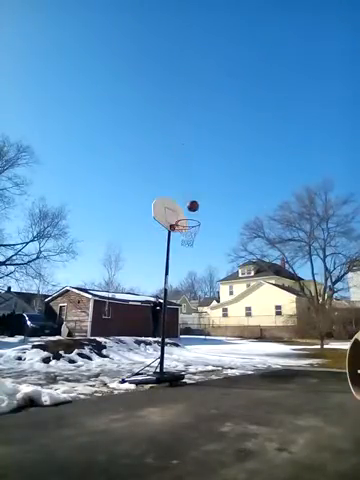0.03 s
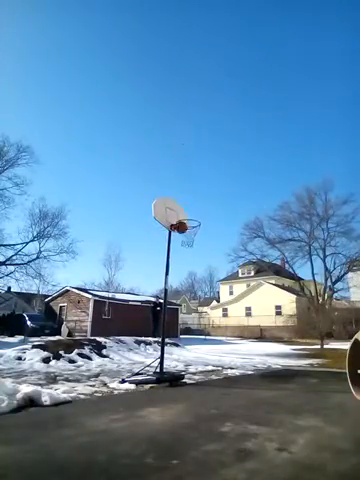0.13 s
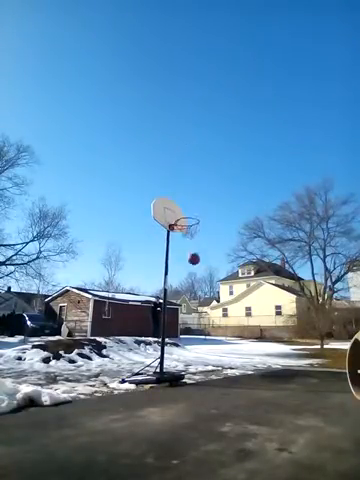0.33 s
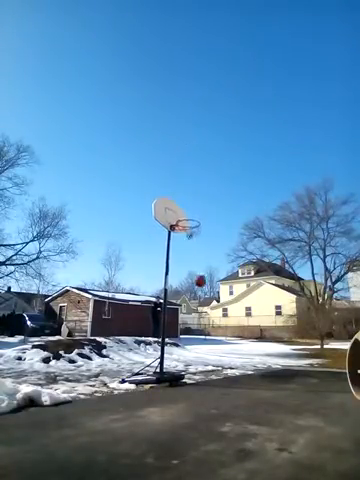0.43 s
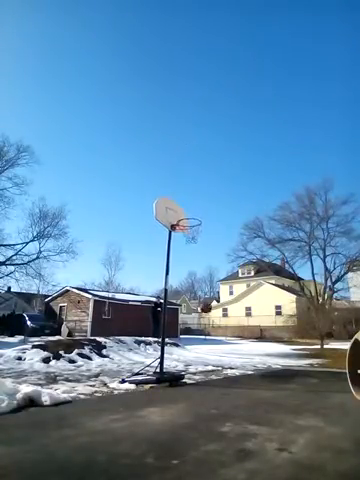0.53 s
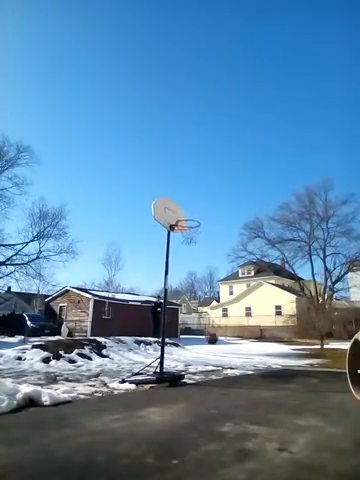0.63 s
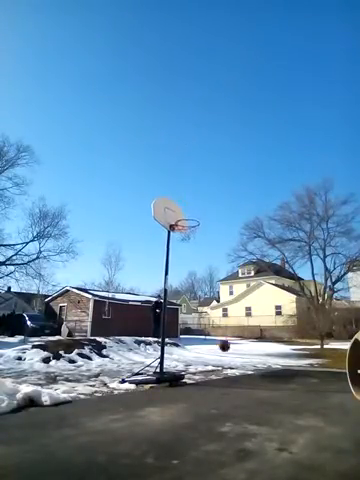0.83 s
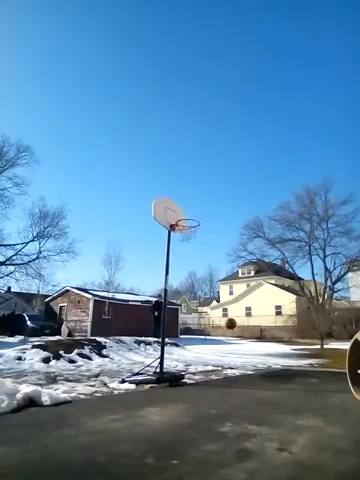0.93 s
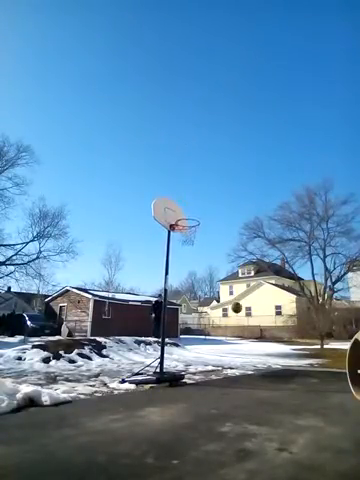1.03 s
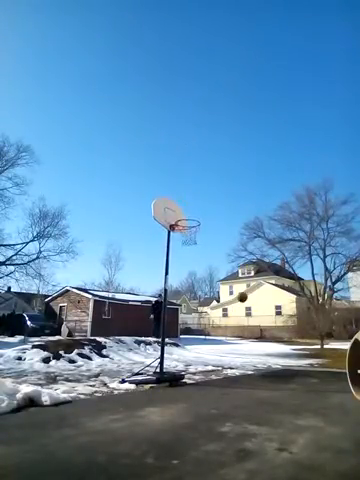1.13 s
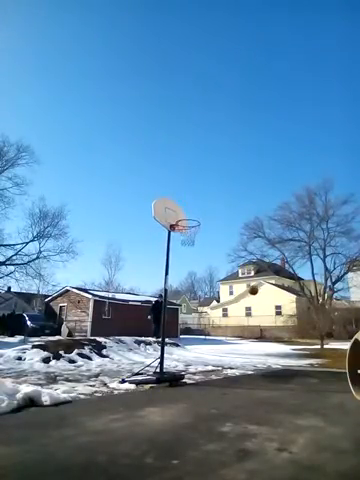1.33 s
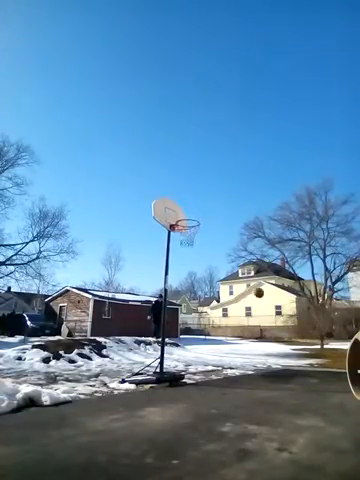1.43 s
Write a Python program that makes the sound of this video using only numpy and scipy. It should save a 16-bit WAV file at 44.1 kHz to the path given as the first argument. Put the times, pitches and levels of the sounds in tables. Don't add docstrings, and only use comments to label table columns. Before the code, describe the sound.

Loud metallic rattle of a basketball hoop hit by a ball, followed by one bounce on pavement

```python
import sys
import numpy as np
from scipy import signal
from scipy.io import wavfile
from scipy.ndimage import uniform_filter1d, minimum_filter1d

SR = 44100
rng = np.random.default_rng(int(sys.argv[2]) if len(sys.argv) > 2 else 0)


def boost_factor(decibels):
    exponent = np.asarray(decibels, float) / 20
    return 10 ** exponent


def transcribe(u):
    v = np.clip(np.atleast_2d(u).T, -1, 1)
    q = np.round(v * 32767).astype(np.int16)
    wavfile.write(sys.argv[1], SR, q)


N = 66150

# f/Hz, level/dB per Hz
AIR_SPECTRUM = [(25, -21), (87, -4.5), (172, -8.5), (330, -17), (1500, -28.5), (3800, -33.5), (7000, -34),
                (12000, -51)]
# t/s, level/dB
THUDS = [(0.104, -49), (0.191, -39.5), (0.219, -25.5), (0.282, -23.5), (0.33, -31.5), (0.436, -30.5),
         (0.559, -31), (0.729, -36), (0.818, -33), (0.894, -50), (0.961, -33.5), (1.02, -35),
         (1.155, -37.5), (1.357, -46), (1.471, -53)]
# f/Hz, level/dB per Hz
THUD_SPECTRUM = [(30, -48), (60, -3.5), (90, 6), (130, -1.5), (200, 1), (300, -16.5), (600, -32.5)]
# t/s, level/dB
GROANS = [
    (0.932, -14),
    (1.133, -15.5),
    (1.194, -16.5),
    (1.245, -12.5),
    (1.292, -19.5),
]
# f/Hz, level/dB per Hz
GROAN_SPECTRUM = [(150, -17.5), (300, 0.5), (600, 3), (900, -6.5), (1500, -31)]
# t/s, level/dB
SNAPS = [(0.218, -37), (0.2319, -28), (0.3004, -23.5), (0.454, -32), (0.4813, -36), (0.537, -25),
         (0.6433, -34.5), (0.8744, -35), (1.08, -43), (1.141, -44), (1.164, -48)]
# f/Hz, level/dB
SNAP_SPECTRUM = [(5000, -48), (7500, -24), (9000, -13), (11000, -16.5), (12400, -13), (13500, -13.5),
                 (15000, -14), (16200, -29)]
# t/s, slap level/dB, slap t60/s, thump level/dB, thump f/Hz
BALL_HITS = [
    (0.219, 4.5, 0.0072, -23.5, 115),
    (0.8758, 3.5, 0.0097, -17, 120),
    (0.8846, -10.5, 0.026, -48, 150),
]
# f/Hz, level/dB
SLAP_SPECTRUM = [(100, 10), (1000, 3), (2500, 2), (4000, 1.5), (5500, -2), (6800, 2), (10000, -21.5)]
# f/Hz, level/dB, t60/s
BALL_MODES = [(1050, -26, 0.085), (1957, -27, 0.058), (251, -20, 0.048), (345.6, -22, 0.06)]
# t/s, peak level/dB, board knock level/dB, t60/s, ringing part f/Hz
SWINGS = [(0.2263, -6, -23, 0.053, 5000), (0.2285, 1.5, -26, 0.054, 5510),
          (0.2325, -1.5, -21.5, 0.028, 6050), (0.2368, -8, -23.5, 0.059, 6070),
          (0.2468, -14.5, -13, 0.1, 5230), (0.281, -4, -27.5, 0.062, 5860), (0.288, -9, -19, 0.055, 5270),
          (0.2989, -6, -52, 0.11, 5174), (0.3143, -12, -52, 0.14, 5200), (0.3295, -19.5, -32, 0.2, 4840),
          (0.3617, -10.5, -21, 0.036, 6300), (0.3688, -6.5, -20, 0.057, 5520),
          (0.382, -7.5, -24.5, 0.08, 6360), (0.3948, -11, -16, 0.08, 4560), (0.445, -20, -29, 0.067, 5310),
          (0.4515, -15, -25, 0.0825, 5400), (0.46, -10.5, -27.5, 0.039, 6430),
          (0.4657, -17.5, -54, 0.083, 5100), (0.4796, -7, -33, 0.058, 4960),
          (0.4931, -17.5, -30, 0.056, 4800), (0.53, -11.5, -19.5, 0.0904, 4900),
          (0.5377, -11, -42, 0.0232, 5320), (0.5653, -19.5, -18, 0.066, 5130),
          (0.5745, -11, -25.5, 0.064, 6550), (0.5817, -9.5, -23.5, 0.069, 5030),
          (0.601, -14, -42, 0.086, 4700)]
# t/s, peak level/dB, board knock level/dB, t60/s, ringing part f/Hz
SETTLING = [(0.6361, -12, -30, 0.036, 5070), (0.643, -10.5, -28, 0.024, 5200),
            (0.721, -13, -20, 0.051, 5250), (0.7341, -12.5, -32, 0.05, 6600),
            (0.7454, -10, -28.5, 0.0492, 6700), (0.776, -21.5, -16, 0.032, 4980),
            (0.8103, -16.5, -14.5, 0.05, 4900), (0.814, -8, -22.5, 0.053, 5320),
            (0.863, -10.5, -28, 0.03, 4870), (0.9388, -12, -48, 0.073, 6440),
            (0.9889, -20.5, -14, 0.051, 5460), (1.0142, -21.5, -23.5, 0.0293, 4740),
            (1.06, -25.5, -14.5, 0.055, 4500), (1.078, -20, -22, 0.1, 5090), (1.14, -19, -18, 0.05, 5130),
            (1.164, -14.5, -35, 0.054, 4915), (1.1974, -31.5, -2.5, 0.041, 5080),
            (1.2211, -24.5, -26, 0.13, 6350), (1.2458, -18.5, -12, 0.049, 5600),
            (1.313, -28, -32, 0.054, 5500)]
# f/Hz, level/dB per Hz
CHATTER_SPECTRUM = [(900, -31), (1500, -10.5), (2000, -11), (2800, 3.5), (4000, 1.5), (5200, 3.5),
                    (7000, 3), (16000, -14.5)]
# t/s, level/dB, length/s
SHIVER = (1.338, -32.5, 0.087)
# f/Hz, width/Hz, level/dB
BOARD_MODES = [(484, 62, -3.5), (631, 124, -3.5), (804, 120, -10), (1174, 180, -8), (1385, 260, -5),
               (1501, 21, -10)]
# f/Hz, level/dB per Hz
BOARD_SPECTRUM = [(80, -12.5), (200, 3), (400, -5.5), (800, -5), (1500, -14), (1800, -3), (2500, 0),
                  (4000, -6)]
# peak t/s, level/dB, length/s, f/Hz
CLINKS = [(0.2289, -7.8, 0.0027, 5560), (0.231, -3, 0.0039, 2684), (0.232, -5, 0.0022, 6240),
          (0.235, -7.5, 0.0065, 3324), (0.242, -24, 0.0028, 2800), (0.2449, -28, 0.0029, 4995),
          (0.244, -21, 0.0058, 6100), (0.2489, -21, 0.004, 5120), (0.2839, -13.5, 0.0039, 5990),
          (0.2844, -18, 0.004, 5370), (0.287, -15, 0.0029, 5310), (0.2944, -10, 0.0029, 5060),
          (0.3035, -11, 0.014, 5056), (0.316, -8.5, 0.0054, 5219), (0.326, -20, 0.0035, 5040),
          (0.3707, -17, 0.0046, 6310), (0.371, -9.5, 0.0035, 5560), (0.383, -16.5, 0.0051, 6419),
          (0.3847, -14.9, 0.0031, 5298), (0.393, -16, 0.0026, 5100), (0.401, -21, 0.003, 5680),
          (0.451, -17.5, 0.012, 5080), (0.46, -19.5, 0.0072, 6390), (0.4686, -17, 0.0098, 5180),
          (0.481, -13.5, 0.0035, 5340), (0.5388, -15.5, 0.00332, 5210), (0.5393, -11.5, 0.0029, 6420),
          (0.575, -24, 0.0044, 6476), (0.5832, -13, 0.0027, 4888), (0.5883, -14, 0.0022, 2847),
          (0.5931, -12, 0.0015, 2670), (0.5954, -19, 0.0029, 4700), (0.644, -20.5, 0.0021, 6330),
          (0.6444, -16, 0.0077, 5241), (0.7232, -19.1, 0.0037, 5098), (0.7235, -19, 0.0046, 6300),
          (0.7266, -21, 0.0034, 6380), (0.7498, -18.5, 0.0037, 6404), (0.8168, -16.6, 0.0042, 5420),
          (0.8206, -27, 0.0059, 2638), (0.8231, -23.9, 0.0044, 4783), (0.863, -22, 0.0033, 5000),
          (0.9409, -22.6, 0.0018, 6370), (0.942, -24, 0.0015, 5300), (1.0127, -27.5, 0.0035, 4934),
          (1.0815, -29.0, 0.00624, 4930), (1.082, -26.8, 0.0035, 5712), (1.1637, -22.5, 0.0033, 4870),
          (1.25, -26.5, 0.0047, 6200), (1.252, -24.5, 0.0034, 4890)]
# peak t/s, level/dB, length/s, f/Hz
LOW_CLINKS = [
    (0.59, -19, .002, 5300),
    (0.6, -17.5, 0.0037, 4100),
    (.5905, -20.5, 0.0075, 1450),
    (0.87, -14, 0.0025, 1700),
]
# f/Hz, t60/s
YARD_DECAY = [(100, 0.885), (500, 0.79), (2000, 0.51), (5000, 0.492), (9000, 0.07)]
# t/s, length/s, f/Hz, level/dB
HOLLOW_NOTE = (.749, .029, 612, -22)
# t/s, level/dB
KNOCKS = [
    (.813, -34),
    (1.27, -58),
]
# f/Hz, level/dB, t60/s
STEEL_MODES = [(2202, 0, .1), (2650, -2, .09), (1707, -3, .08), (490, -2, .09), (280, 1, .08),
               (3219, -10, .15)]
# f/Hz, width/Hz, level/dB
RIM_RING = (2203, 24, -62)
# f/Hz, level/dB
MIC_RESPONSE = [(3800, -13), (4500, -6.5), (5100, -2), (5800, -5), (6600, -3.5), (7300, -19.5),
                (9000, -32.5), (14000, -47)]
# f/Hz, level/dB per Hz
HISS_SPECTRUM = [(6000, -20), (8000, -14), (13500, -14), (15000, 0), (15900, -2), (16400, -30)]

SHAKES = SWINGS + SETTLING
SHAKE_RISE_S = 0.0008


def evened(x):
    return x / np.sqrt(np.mean(x ** 2) + 1e-20)


def read(points, hz):
    f, value = np.transpose(points)
    return np.interp(np.log(hz + 1), np.log(f + 1), value)


def colour(x, points):
    level_db = np.maximum(read(points, np.fft.rfftfreq(4096, 1 / SR)), -100)
    half = np.log(boost_factor(level_db))
    full = np.r_[half, half[-2:0:-1]]
    phase = -signal.hilbert(full).imag
    taps = np.fft.ifft(np.exp(full + 1j * phase)).real[:2048]
    return signal.oaconvolve(x, taps)[:len(x)]


def resonate(x, hz, width):
    r = np.exp(-np.pi * width / SR)
    poles = [1, -2 * r * np.cos(2 * np.pi * hz / SR), r * r]
    return signal.lfilter([1, 0, -1], poles, x) * np.sqrt((1 - r * r) / 2)


def since(start):
    return np.maximum(np.arange(N) / SR - start, 0)


def burst(start, db, t60, rise):
    t = since(start)
    return (1 - np.exp(-t / rise)) * boost_factor(db - 60 * t / t60)


def hump(start, length):
    phase = np.pi * np.minimum(since(start) / length, 1)
    return np.sqrt(abs(np.sin(phase)))


def modes(start, db, table):
    t = since(start)
    return sum(boost_factor(db + d - 60 * t / t60) * np.sin(2 * np.pi * hz * t) for hz, d, t60 in table)


def ticks(spread_db):
    contacts_per_s = 5000
    size = boost_factor(spread_db * np.minimum(rng.exponential(1, N), 5)) * rng.standard_normal(N)
    contact = rng.random(N) < contacts_per_s / SR
    return evened(size * contact + 0.33 * rng.standard_normal(N))


def air():
    wash, drift = rng.standard_normal((2, N))
    swell_db = evened(uniform_filter1d(uniform_filter1d(drift, size=1500), size=1500))
    return boost_factor(-41.5 + swell_db) * evened(colour(wash, AIR_SPECTRUM))


def base_thuds():
    shape = sum(burst(s - 0.004, db + 28, 0.22, 0.0065) for s, db in THUDS)
    return colour(shape * rng.standard_normal(N), THUD_SPECTRUM)


def metal_snaps():
    shape = sum(burst(s, db + 42, 0.027, 0.00045) for s, db in SNAPS)
    return colour(shape * ticks(1.9), SNAP_SPECTRUM)


def ball():
    click_db, thump_s = 11.5, 0.012
    noise, out = rng.standard_normal(N), np.zeros(N)
    for start, slap_db, t60, thump_db, hz in BALL_HITS:
        t = since(start)
        click = boost_factor(slap_db + click_db) * (np.arange(N) == round(start * SR))
        slap = colour(click + burst(start, slap_db, t60, 0.00045) * noise, SLAP_SPECTRUM)
        contact = np.exp(-(t / thump_s) ** 4)
        thump = boost_factor(thump_db + 14.5) * contact * np.sin(2 * np.pi * hz * t)
        out = out + slap - thump + modes(start, thump_db + 25, BALL_MODES)
    return out


def chatter():
    level_db, ring_db, ring_width_hz = -4.5, -12.5, 320
    drive = ticks(2)
    drive[[round(row[0] * SR) for row in SHAKES]] = 4
    start, db, length = SHIVER
    bright, rings = boost_factor(db) * hump(start, length), np.zeros(N)
    for start, db, _, t60, hz in SHAKES:
        shake = burst(start - SHAKE_RISE_S, db, t60, SHAKE_RISE_S)
        bright = bright + shake
        rings = rings + resonate(shake * drive, hz, ring_width_hz)
    return boost_factor(level_db) * (colour(bright * drive, CHATTER_SPECTRUM) + boost_factor(ring_db) * rings)


def backboard():
    slower, shape = 2.257, np.zeros(N)
    for start, db, knock_db, t60, _ in SHAKES:
        shape = shape + burst(start - SHAKE_RISE_S, db + knock_db, slower * t60, 0.0065)
    knock = shape * ticks(2.28)
    plate = sum(boost_factor(db) * resonate(knock, hz, width) for hz, width, db in BOARD_MODES)
    return boost_factor(16.0) * (colour(knock, BOARD_SPECTRUM) + boost_factor(-12.5) * plate)


def clinks():
    level_db, sharpness = 1, 1.69
    out = np.zeros(N)
    for peak, db, length, hz in CLINKS + LOW_CLINKS:
        u = since(peak - length / sharpness) * sharpness / length
        swell = (u * np.exp(1 - u)) ** 2
        out = out + boost_factor(db + level_db) * swell * np.sin(2 * np.pi * hz * since(0))
    return out


def yard(x):
    build_up_s = 0.0051
    taps = np.zeros(SR)
    at = np.arange(0, SR - 20, 20) + rng.integers(0, 20, (SR - 1) // 20)
    taps[at] = rng.choice([-1., 1.], len(at))
    hz, t, bands = signal.stft(taps, SR, nperseg=256)
    decay = boost_factor(-60 * t / read(YARD_DECAY, hz)[:, None])
    tail = signal.istft(bands * decay, SR, nperseg=256)[1]
    tail = tail * np.minimum(np.arange(len(tail)) / SR / build_up_s, 1)
    return signal.fftconvolve(x, tail / np.linalg.norm(tail))[:N]


def hollow_base():
    start, length, hz, db = HOLLOW_NOTE
    return boost_factor(db) * hump(start, length) * np.sin(2 * np.pi * hz * since(start))


def steel():
    hz, width, db = RIM_RING
    shaken = burst(KNOCKS[0][0], db, 4.1, 0.02) * rng.standard_normal(N)
    after = resonate(resonate(shaken, hz, width), hz, width) / np.sqrt(SR / width / 6)
    tones = sum(np.minimum(since(s) / 0.005, 1) * modes(s, d, STEEL_MODES) for s, d in KNOCKS)
    return boost_factor(16.5) * (after + tones)


def base_groans():
    shape = sum(burst(s, db, 0.26, 0.0063) for s, db in GROANS)
    return colour(shape * rng.standard_normal(N), GROAN_SPECTRUM)


def scene():
    hoop = metal_snaps() + chatter() + backboard() + steel()
    bounce, clinking = ball(), clinks()
    echoes = boost_factor(-11) * yard(hoop + 0.51 * bounce + 0.35 * clinking)
    base = base_thuds() + hollow_base() + base_groans()
    return (air() + base + hoop + bounce + clinking + echoes)[None]


def band_limit(x):
    return signal.sosfilt(signal.butter(12, 16400, fs=SR, output="sos"), x)


def record(dry):
    ceiling, hiss_db, edge_hz = 0.75, -77.5, 15650
    hiss = boost_factor(hiss_db) * evened(colour(rng.standard_normal(N), HISS_SPECTRUM))
    heard = colour(dry[0], MIC_RESPONSE)
    gain = minimum_filter1d(ceiling / np.maximum(abs(heard), ceiling), size=89)
    limited = heard * uniform_filter1d(gain, size=89)
    edge = signal.firwin(255, edge_hz, window=("kaiser", 8), fs=SR)
    mix = signal.oaconvolve(limited + hiss, edge, "same")
    return band_limit(mix[None])


dry = scene()
out = record(dry)
transcribe(out)
```